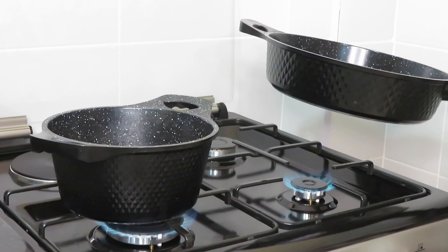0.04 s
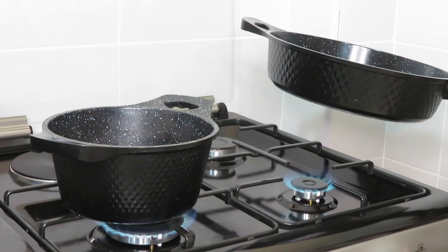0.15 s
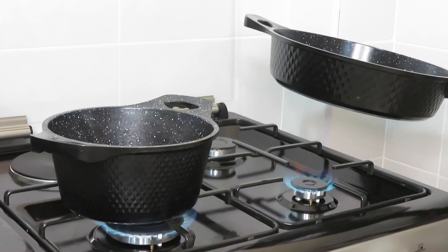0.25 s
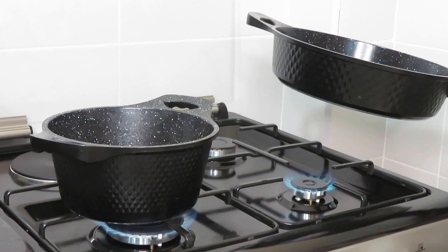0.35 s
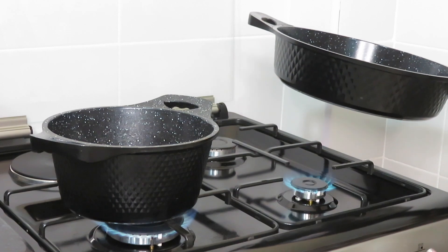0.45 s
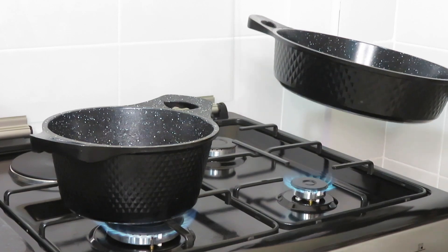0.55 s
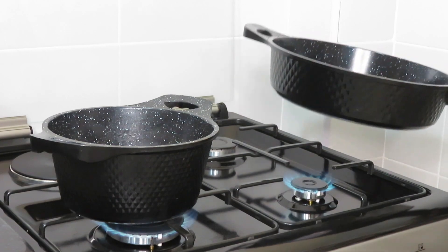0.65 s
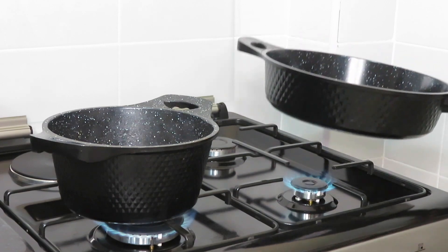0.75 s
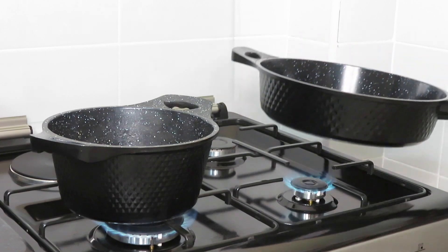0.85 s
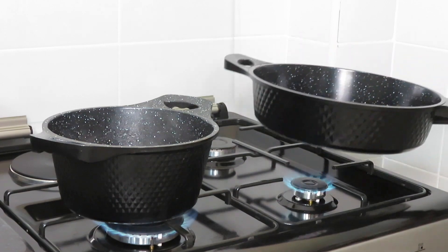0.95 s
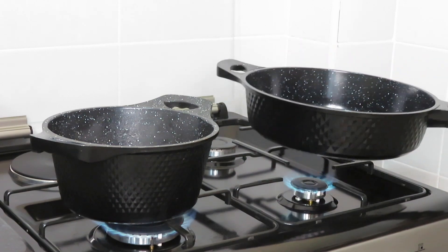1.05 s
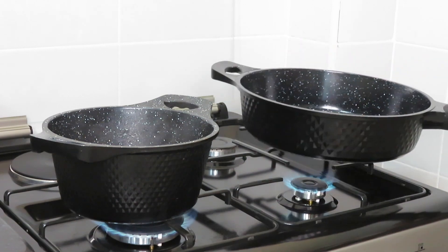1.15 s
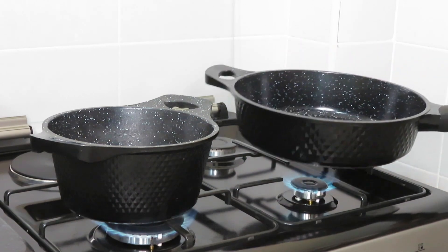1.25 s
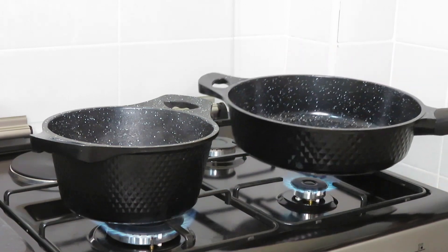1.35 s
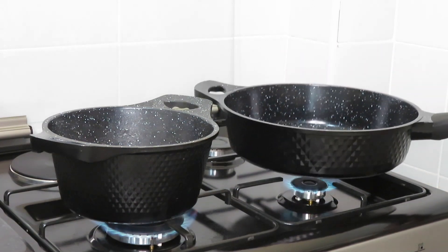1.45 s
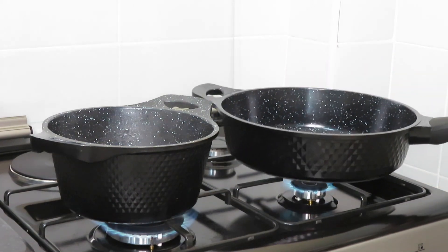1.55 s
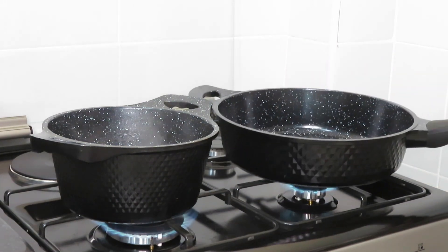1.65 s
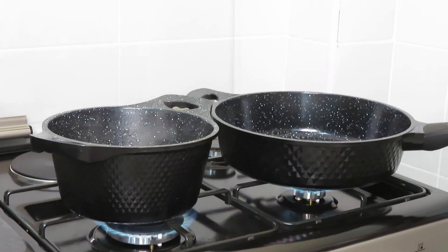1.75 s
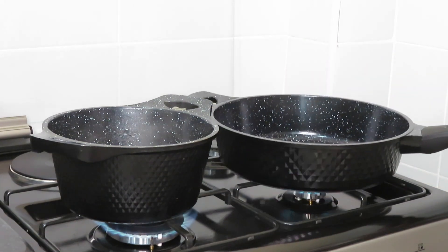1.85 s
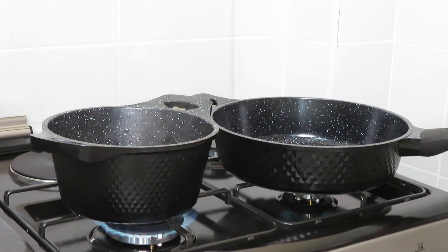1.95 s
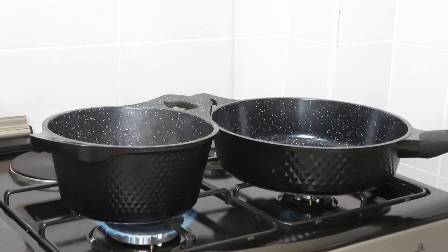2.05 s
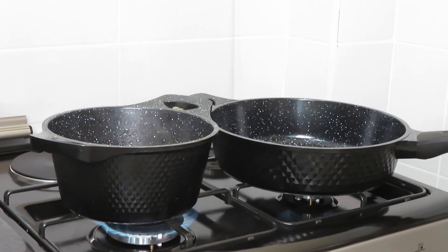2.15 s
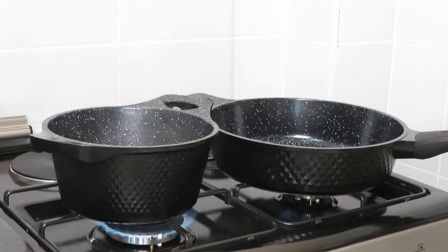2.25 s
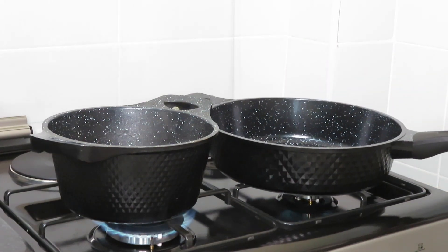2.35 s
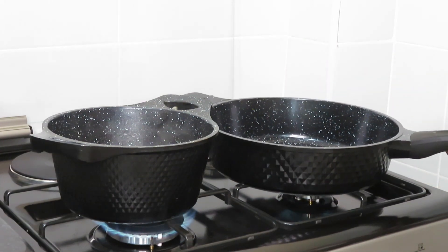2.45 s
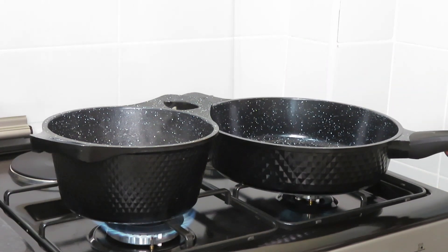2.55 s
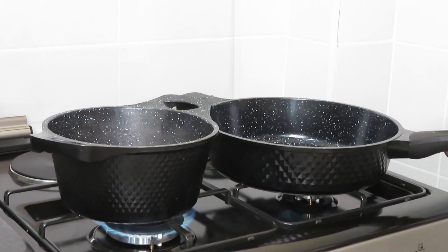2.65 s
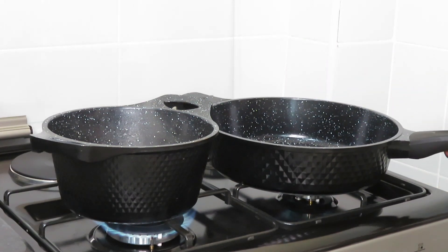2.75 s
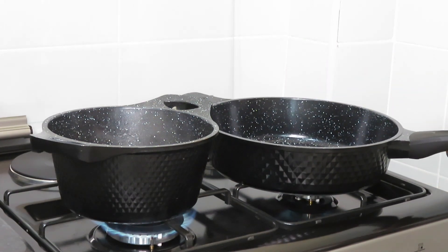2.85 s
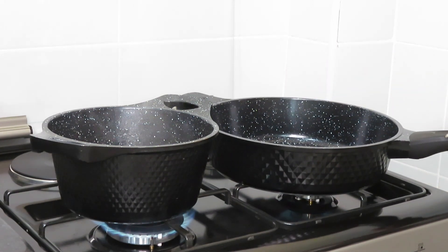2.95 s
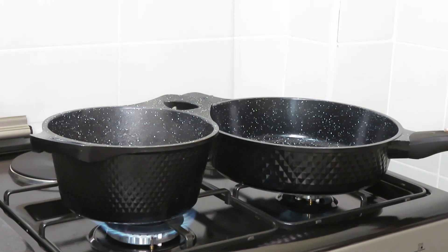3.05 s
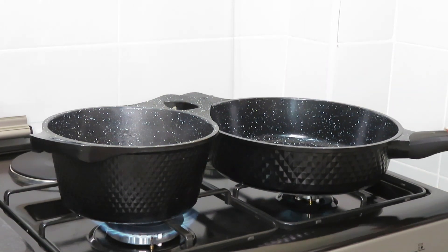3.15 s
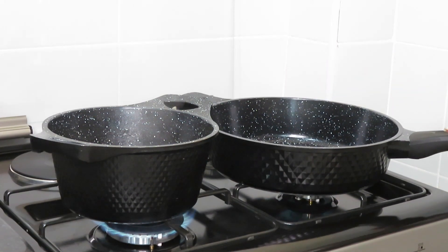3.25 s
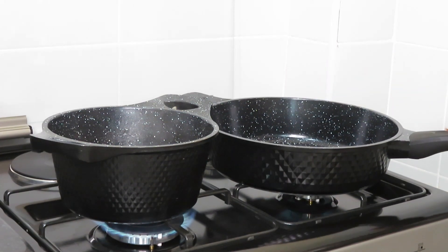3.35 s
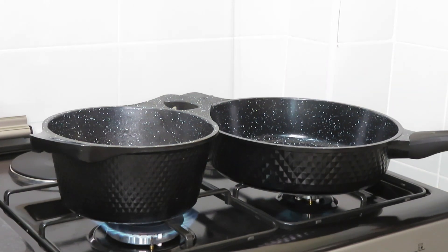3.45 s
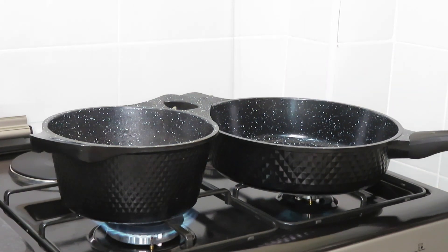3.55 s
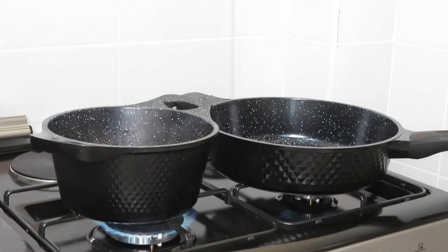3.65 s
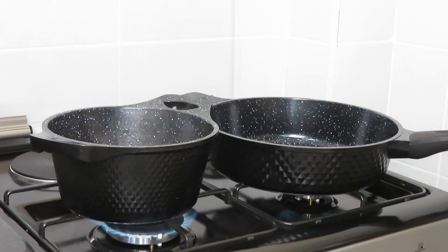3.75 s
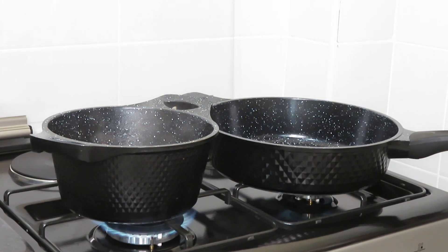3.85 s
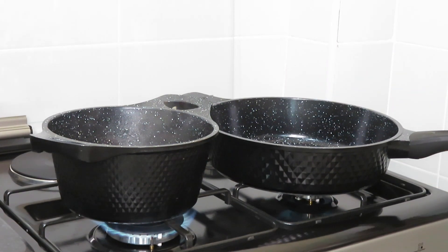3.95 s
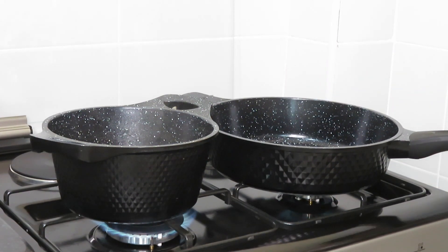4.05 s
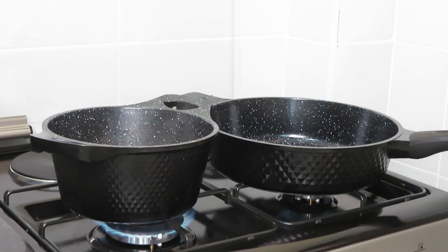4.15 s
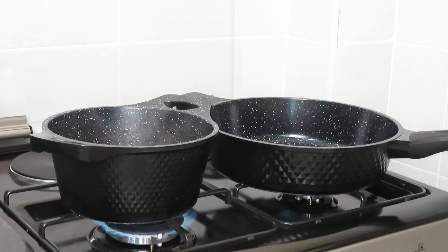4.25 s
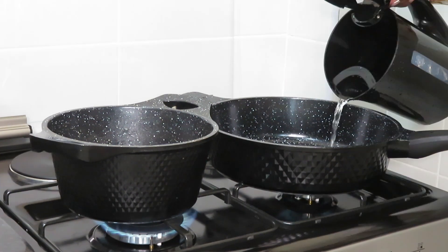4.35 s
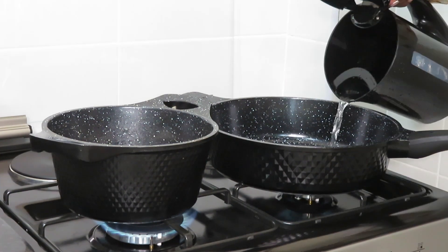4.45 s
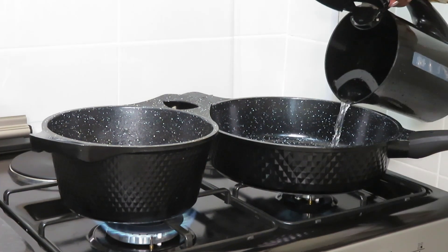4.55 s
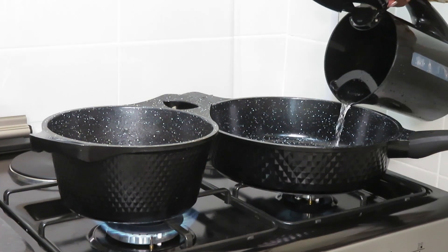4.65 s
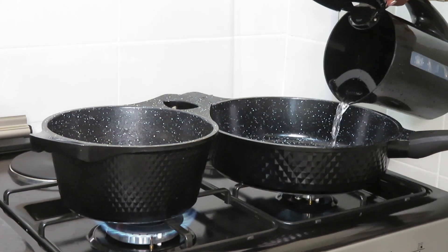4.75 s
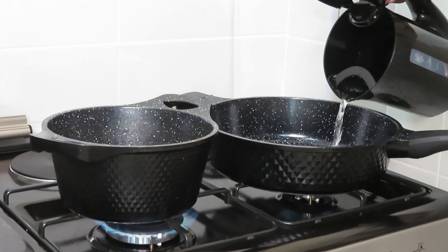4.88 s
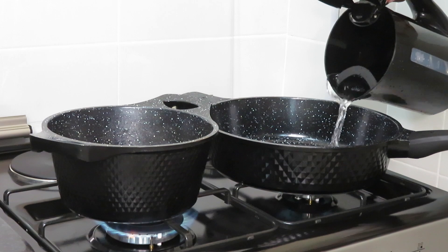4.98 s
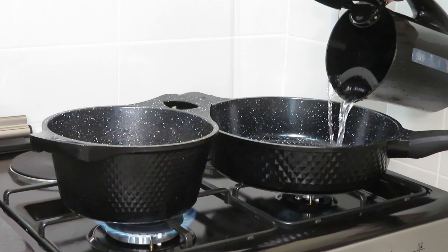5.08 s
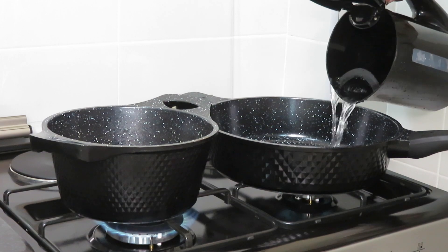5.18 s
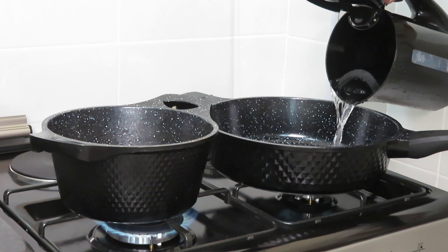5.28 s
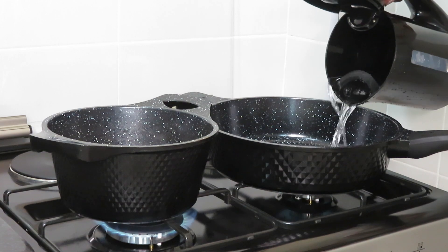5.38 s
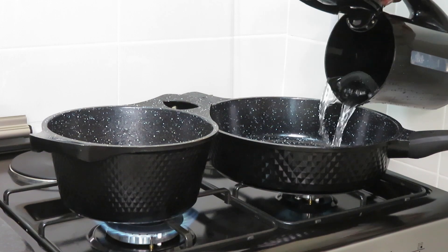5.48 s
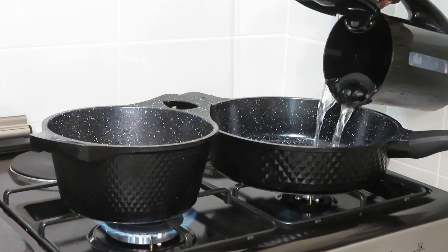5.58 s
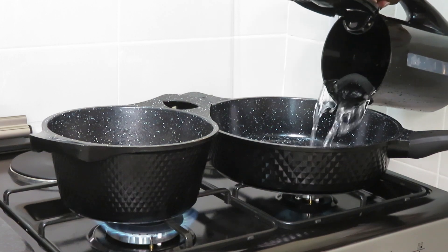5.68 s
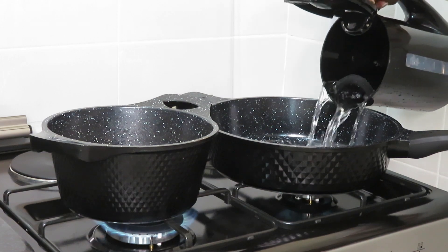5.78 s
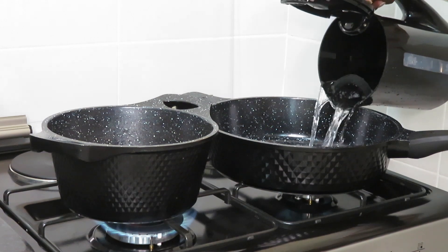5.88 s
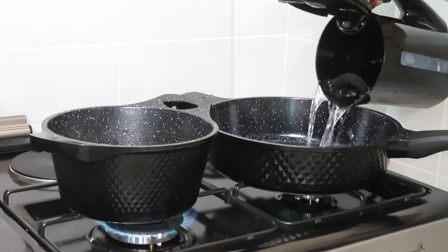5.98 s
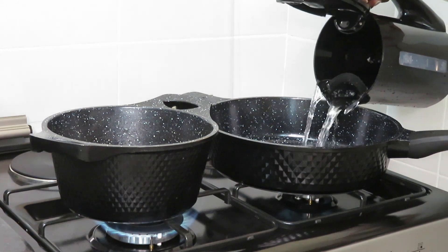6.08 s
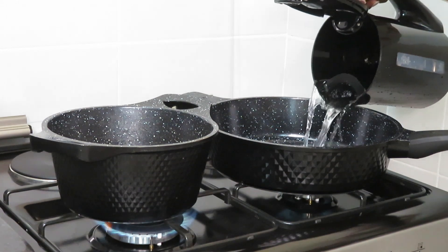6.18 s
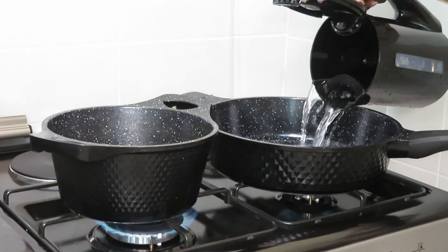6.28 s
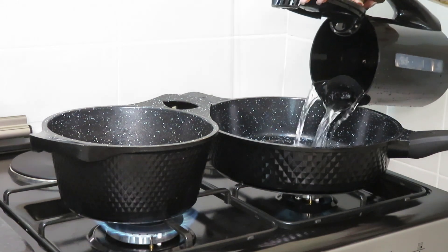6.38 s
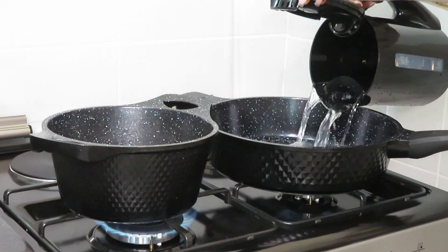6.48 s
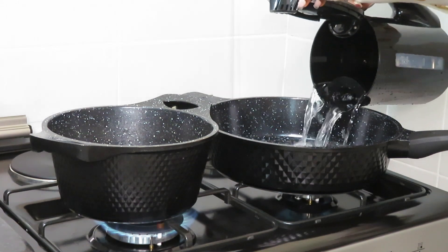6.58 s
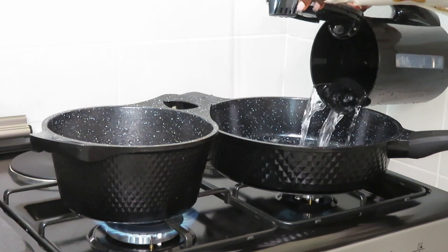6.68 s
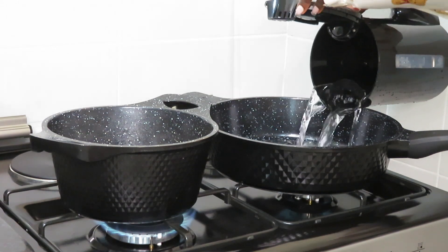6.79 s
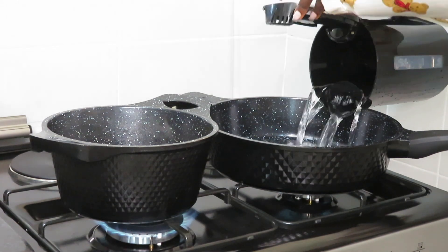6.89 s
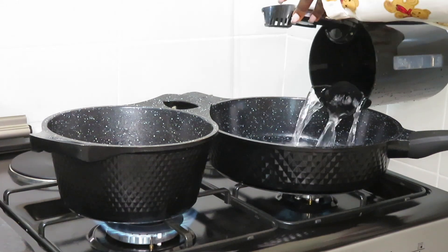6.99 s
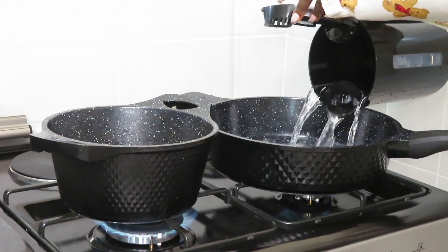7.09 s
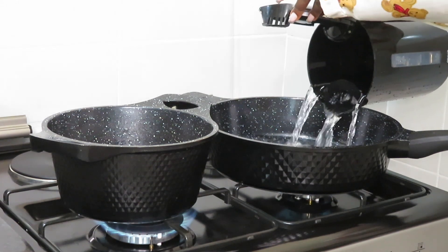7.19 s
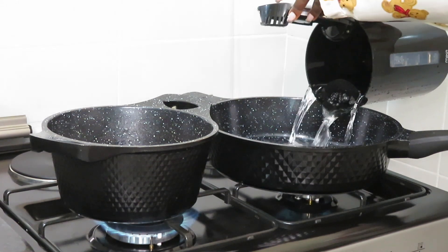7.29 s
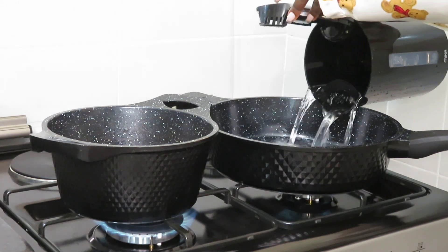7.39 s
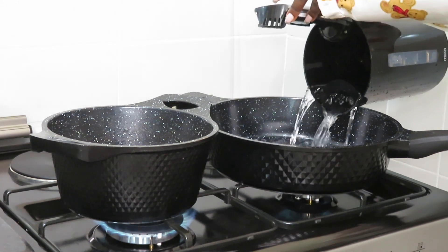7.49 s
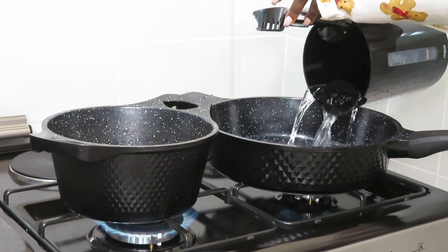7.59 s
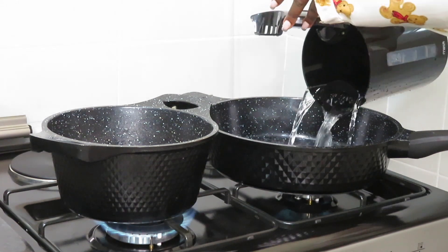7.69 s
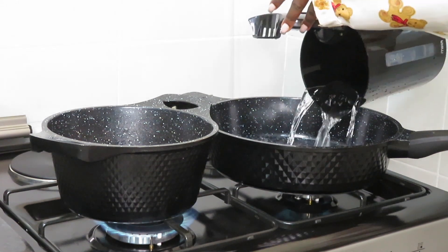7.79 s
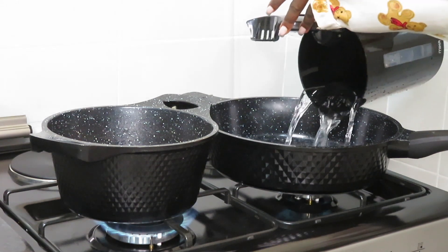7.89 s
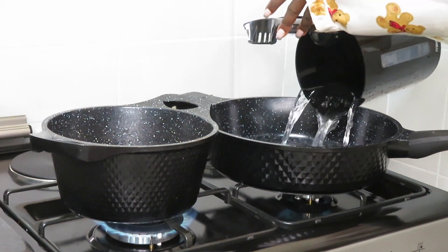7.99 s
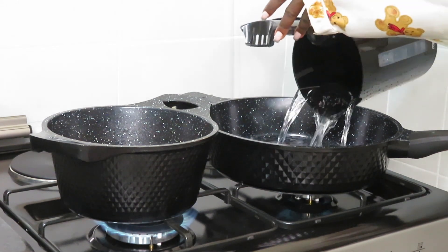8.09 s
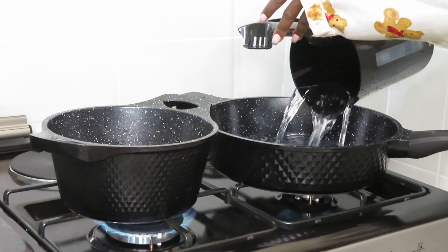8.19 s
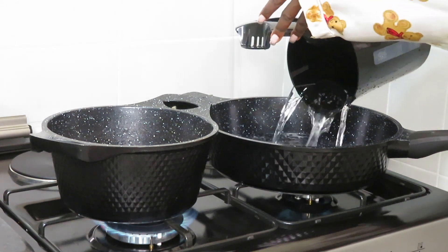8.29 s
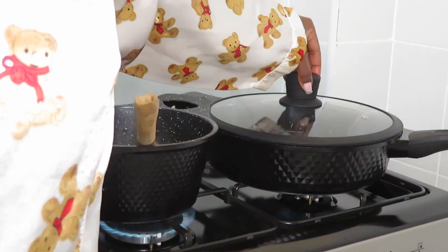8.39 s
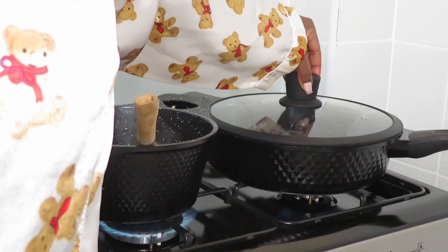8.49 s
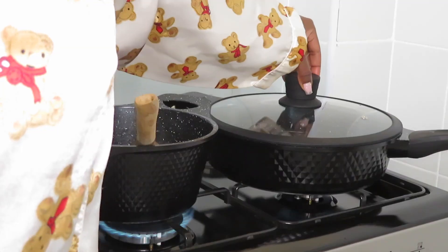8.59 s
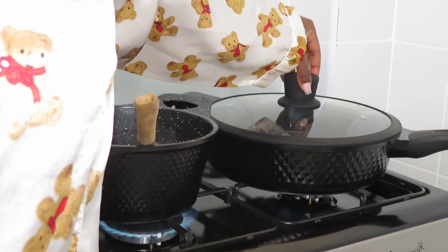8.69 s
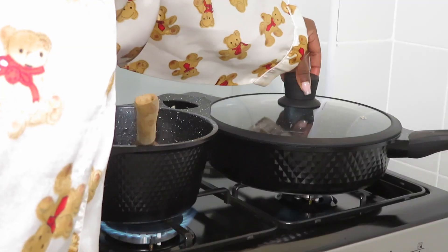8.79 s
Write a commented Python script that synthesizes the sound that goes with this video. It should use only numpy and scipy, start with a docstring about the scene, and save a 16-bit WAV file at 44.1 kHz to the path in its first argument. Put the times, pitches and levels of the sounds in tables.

```python
"""A tiled kitchen: gas burners roar and flutter, made of noise shaped into jets, flames and hiss.
A knob clacks and a cast pan lands on the grate, rattles and drags: decaying tones and noise bursts.
A slipper sole scuffs with a sinking squeak: grainy noise through moving resonances.
Then a kettle pours into the hot pan: frothy sizzle, ringing drops, splashes, glugs and a hollow hum."""
import sys
import numpy as np
from scipy import signal
from scipy.fft import rfft, irfft, next_fast_len
from scipy.io import wavfile
from scipy.ndimage import uniform_filter1d, map_coordinates

SR = 44100
rng = np.random.default_rng(int(sys.argv[2]) if len(sys.argv) > 2 else 0)


def to_wav(s):
    """Save 16-bit WAV."""
    ch = np.atleast_2d(s).T  # columns
    pcm = np.round(np.clip(ch, -1, 1) * 32767)  # PCM
    wavfile.write(sys.argv[1], SR, pcm.astype(np.int16))


N = 389394  # length in samples

# Loudest plops and spits: start_s, relative_level_db, starting_pitch_hz, smear_t60_s (time to fall 60 dB)
DROPS = [(5.008, -48, 3044, .41), (5.459, -46, 7270, .22), (5.583, -45.5, 9100, .24),
         (5.732, -46.5, 5080, .19), (5.881, -44.5, 6530, .27), (5.919, -45.5, 9640, .17),
         (6.037, -43, 11300, .084), (6.26, -38, 1996, .15), (6.377, -45.5, 8800, .2),
         (6.497, -41, 3800, .4), (6.51, -44, 1620, .3), (6.699, -43, 6380, .25), (6.716, -35.5, 2500, .17),
         (6.831, -43.5, 11200, .1), (7.006, -42.5, 1250, .12), (7.05, -47.5, 3100, .54),
         (7.111, -41.5, 3380, .45), (7.147, -40.5, 7900, .12), (7.159, -45.5, 4200, .3),
         (7.219, -45, 1370, .2), (7.295, -44, 3000, .11), (7.362, -44, 1380, .3), (7.395, -44, 1300, .4),
         (7.392, -45, 6600, .08), (7.457, -41, 11220, .1), (7.467, -46, 3025, .34),
         (7.471, -41.5, 1800, .23), (7.504, -37, 2196, .18), (7.538, -35.5, 1895, .12),
         (7.539, -42, 4850, .18), (7.55, -42, 3400, .15), (7.576, -41, 1755, .21), (7.652, -43, 1934, .25),
         (7.697, -43, 5300, .39), (7.702, -43, 4100, .35), (7.863, -36.5, 3350, .08),
         (7.865, -46.5, 1662, .18), (7.907, -36.5, 8550, .088), (7.938, -39, 1918, .24),
         (8.013, -44, 3740, .45), (8.024, -37.5, 2424, .2), (8.05, -43, 7980, .19), (8.159, -42, 6360, .1),
         (8.177, -43.5, 2180, .21), (8.206, -40, 4120, .22), (8.248, -45.5, 2046, .53),
         (8.299, -41, 1763, .18), (8.338, -38.5, 6330, .13), (8.338, -40, 1512, .18),
         (8.375, -40, 6460, .091)]
# A gush slaps the pan floor: start_s, relative_level_db
SPLASHES = [(5.824, -27), (5.838, -31)]
# Ring of the pan under water: pitch_hz, relative_level_db
WET_PAN = [(1560, -8), (2380, 0), (3030, -1), (3390, -2), (3760, -4), (4470, -9)]
WET_WIDTH_HZ = 60
# Air pockets: start_s, relative_level_db, starting_pitch_hz, timescale_s (several fades are scaled from it)
GLUGS = [(7.005, -22, 440, 0.1), (7.008, -36, 150, 0.15), (7.021, -35, 1020, .06), (7.028, -29, 375, 0.11),
         (7.075, -33, 310, 0.15), (7.103, -35, 510, .06), (8.43, -52, 100, .3), (8.442, -37, 184, 0.15),
         (8.487, -36, 173, 0.196)]
GLUG_SAG = 1.5  # half the share of its starting pitch that a pocket loses per s
# Air gulps make the emptying kettle hum: peak_s, low_tone_db, high_tone_db
HOLLOW = [(7.93, -74, -54), (8.05, -55, -50), (8.12, -70, -50), (8.2, -51, -42), (8.3, -58, -52),
          (8.37, -53, -60)]
# The low and high hum of the kettle: pitch_hz, width_hz
HOLLOW_TONES = [(205, 5.2), (720, 44)]
GULP_RISE, GULP_FALL = 300, 190  # dB/s
# Small drops fall at random between these times, ever more densely: start_s, end_s
POUR_S = (5.2, 8.36)
SMALL_DB, SMALL_SPREAD_DB = -52, 6  # middle and full range of their relative level
# Pitch range of the small drops: lowest_hz, highest_hz
SMALL_HZ = (1400, 11000)
DROP_T60, SHORTER_UP = .3, .3  # smear of a small drop at 2 kHz in s; it shrinks with this power of pitch

# Pan touches the grate: start_s, relative_level_db
LANDINGS = [(2.011, -27), (2.0195, -7)]
# Ringing modes of pan and grate: pitch_hz
PAN_HZ = [118, 183, 298, 511, 625, 743, 834, 1034, 1222, 1820, 3445, 1532, 1759, 2139, 2304, 2466, 2638,
          2822, 3325, 3407, 3601, 4291, 4464, 5152, 6465, 7817]
# The same modes: relative_level_db, t60_s (before the seated pan is damped)
PAN_MODES = [(-16, .3), (-19, .8), (-17, .8), (-10, .35), (-15, .7), (-18, .7), (-7, .95), (-21, 1.1),
             (-7, .45), (-19, .8), (-18, .8), (-15, 1), (-16.5, .7), (-16, 1), (-21, .5), (-15.5, 0.95),
             (-19.5, .8), (-5.5, 0.45), (-1, .6), (-10, .5), (-14, 0.75), (-16, .4), (-17, .5), (-14, 0.2),
             (-26, 0.11), (-24.5, .2)]
# Dense modes of the hob top: frequency_hz, relative_level_db
CLANG = [(40, -65), (120, -7), (830, -5.5), (2900, -12.5), (5000, -18.5), (11400, -24.5), (14000, -60)]
# How long the clang rings: frequency_hz, t60_s
CLANG_T60 = [(100, 1), (500, 0.98), (2000, 0.88), (5000, .45), (12000, .2)]
SEATED_S, SEATED_KEEPS = .24, .18  # when the weight settles, in s after contact; share of ring left
BEAT_HZ = 45  # random level points per second for each mode
PORT_TURN = .015  # typical random phase offset of a mode in each channel, in cycles
# The pan rocks on the bars: start_s, level_db (average over one second)
RATTLES = [(2.305, -57), (2.385, -60), (2.455, -58), (2.538, -53), (2.6, -60)]
RATTLE_T60 = .06  # s, for the noise that strikes the grate
# Resonances of the grate: pitch_hz, width_hz, relative_level_db
GRATE = [(70, 40, -21), (120, 30, -8), (180, 14, 3), (300, 20, 4), (405, 40, -6), (511, 40, -7),
         (615, 50, -5), (834, 25, -14), (1040, 60, -16)]
# Pan dragged on the grate: hold_from_s, hold_to_s, level_db, rise_db_per_s, fall_db_per_s
SLIDE = (2.15, 2.6, -41.5, 400, 240)
# Base grates over a bar: hold_from_s, hold_to_s, level_db, rise_db_per_s, fall_db_per_s
SCRAPE = (2.3, 2.56, -55, 120, 200)

# Knob clacks: start_s, panel_db, snap_db, thud_db (all relative), panel_t60_s
KNOB = [(0.0156, -26.5, -13, -44, 0.61), (.069, -23.5, -39.5, -42, 0.19), (.256, -14, -47.5, -33.5, 0.31),
        (.36, -16, -47, -37, .25)]
# Tones of knob and front panel: pitch_hz, relative_level_db, t60_s (an overall fade shortens them)
PANEL = [(330, -9, .3), (700, -9, .4), (1086, -4.5, 0.23), (1600, -7, 0.54), (1843, -6, 0.26),
         (2148, -3, .17), (2500, -7, 0.41), (2790, 5, 0.12), (3350, -3, .1), (3128, -3, .17),
         (4102, -6, .12)]

# Rub of the sole: frequency_hz, relative_level_db
SOLE = [(800, -41), (1300, -16), (2170, -3), (2900, -8), (4000, -12), (5080, -23), (12000, -47)]
# The sole's resonance sinks as it flattens: time_s, pitch_hz
SQUEAK = [(3.13, 2750), (3.2, 2300), (3.3, 2100), (3.37, 1850)]
SQUEAK_DB, OVERTONE, OVERTONE_DB = 6, 1.7, 1  # boost, overtone pitch ratio, overtone boost
# Sole drags: hold_from_s, hold_to_s, level_db, rise_db_per_s, fall_db_per_s
SOLE_DRAG = (3.19, 3.32, -37.5, 200, 270)
# Dull heel tone: hold_from_s, hold_to_s, level_db, rise_db_per_s, fall_db_per_s
HEEL_TONE = (3.283, 3.31, -47, 700, 360)

# Burner levels: time_s, jet_roar_db, flame_flutter_db
BURNER = [(0, -44, -50), (.55, -49, -53), (1.1, -52, -56.5), (2, -56, -64.5), (2.55, -53.5, -60),
          (2.75, -58, -66), (3.5, -64.5, -67), (4.355, -68.5, -75), (4.37, -50, -55), (5.2, -48, -55),
          (5.8, -44, -55.5), (6.2, -48, -52.5), (6.6, -45, -51), (6.98, -52, -63), (7.4, -40, -55),
          (7.85, -49, -63.5), (8.39, -46, -59), (8.41, -44, -51.5), (8.83, -46, -48.5)]
# Tone balance of the gas jets: frequency_hz, relative_level_db
JETS = [(700, -40.5), (1160, -15), (1470, -2.5), (2260, -1), (2800, -11.5), (3300, -16), (4050, -11),
        (5660, -22.5), (7000, -33.5), (10000, -71.5)]
# Tone balance of the low flame flutter: frequency_hz, relative_level_db
FLAME = [(30, -56), (128, -18), (400, -12), (594, 0), (650, -8), (754, -3), (893, -13.5), (1150, -22.5),
         (1600, -60.5)]
# Tone balance of hiss and sizzle: frequency_hz, relative_level_db
FIZZ = [(1470, -31.5), (2500, -6.5), (5840, -10), (7750, -15), (11000, -15), (13600, -20), (15500, -33.5)]
GAS_HISS_DB, GAS_HISS_FOLLOWS = -70, .4  # level at a roar of -55 dB; share of roar swings followed
PUFF_DB, PUFF_T60 = -38, .7  # unlit gas puffs out at the very start; t60 in s
# Water on hot metal: time_s, level_db
SIZZLE = [(4.37, -50), (4.6, -52), (5.8, -53.5), (6, -45), (6.6, -61), (7.4, -54), (7.85, -54), (8.39, -64),
          (8.41, -50.5), (8.83, -52)]
# Share of the hiss broken into bursts: time_s, share_0_to_1
FROTH = [(4.9, 0), (5.3, .35), (6.3, .65), (7, .9), (8.39, .9), (8.4, 0)]

# Left-right likeness of spread sounds: frequency_hz, likeness_0_to_1
ALIKE = [(60, .92), (180, .6), (550, .78), (1650, .97), (5000, .75), (12000, 0)]
# Left-right likeness of blows and drops: frequency_hz, likeness_0_to_1
NEAR = [(100, .99), (1800, .98), (5000, .8), (12000, 0)]
# The level dips briefly: time_s, half_length_s
DIPS = [(4.372, .02), (8.406, .025)]
TOP_HZ = 15690  # nothing is heard from here up


def water():
    """Drops ring, gushes slap the pan, air pockets glug as sinking tones, and the kettle hums."""
    out, t = np.zeros((2, N)), np.arange(SR // 3) / SR
    for s, db, hz, t60 in [*DROPS, *small_drops(count=80)]:
        add(out, s, amp(db) * drop(hz, t60, t))

    def wet_ring(f):
        modes = sum(amp(level) * peak(hz, WET_WIDTH_HZ)(f) for hz, level in WET_PAN)
        return .15 * peak(3200, 5000)(f) ** 3 + modes

    for s, db in SPLASHES:
        add(out, s, amp(db) * pair(wet_ring, len(t)) * fade(t, .26, .0005))
    for s, db, hz, scale in GLUGS:
        slosh = pair(lambda f: peak(hz, 1.5 * hz)(f) ** 2, len(t)) * fade(t, 4 * scale, .0047)
        tone = np.sin(2 * np.pi * hz * t * (1 - GLUG_SAG * t))
        tone *= np.exp(-(5 * t / scale) ** 3) * fade(t, 3 * scale, .001)
        add(out, s, amp(db) * (tone + .32 * slosh))
    for tone, (hz, width) in enumerate(HOLLOW_TONES):
        gulps = sum(amp(swell(s, s, dbs[tone], GULP_RISE, GULP_FALL)) for s, *dbs in HOLLOW)
        out += gulps * pair(peak(hz, width), N)
    return out


def drop(hz, t60, t):
    """A short rising bubble tone and the narrow, uneven smear that pan and tiles give back."""
    bubble = np.sin(2 * np.pi * hz * t * (1 + 1.5 * t)) * fade(t, 110 / hz, .001)
    lumps_db = 5 * rng.standard_normal(120)
    lump_hz = np.linspace(0, 2 * hz, len(lumps_db))
    answer = lambda f: peak(hz, .27 * hz)(f) ** 3 * amp(np.interp(f, lump_hz, lumps_db))
    return 2.7 * bubble + 1.7 * pair(answer, len(t)) * fade(t, t60, .0015)


def small_drops(count):
    """Rows like those of DROPS, at random times, strengths and pitches."""
    when, size, pitch = rng.random((count, 3)).T
    start_s = POUR_S[0] + np.sqrt(when) * (POUR_S[1] - POUR_S[0])  # the root crowds them late
    level_db = SMALL_DB + SMALL_SPREAD_DB * (size - .5)
    hz = SMALL_HZ[0] * (SMALL_HZ[1] / SMALL_HZ[0]) ** pitch
    return np.column_stack([start_s, level_db, hz, DROP_T60 * (2000 / hz) ** SHORTER_UP])


def pan():
    """A landing rings clear modes over a dense clang that dies faster in the treble; then drag and rattle."""
    out, t = np.zeros((2, N)), np.arange(SR) / SR
    lumps_db = 4 * rng.standard_normal(1200)  # many close modes make the clang uneven in pitch
    lump_hz = np.linspace(0, SR / 2, len(lumps_db))
    clang_tone = lambda f: amp(along(CLANG, f) + np.interp(f, lump_hz, lumps_db))
    # the ring is damped once the full weight rests on the grate
    seated = SEATED_KEEPS + (1 - SEATED_KEEPS) / (1 + (t / SEATED_S) ** 12)
    for s, db in LANDINGS:
        hz, frame_s, z = signal.stft(pair(clang_tone, SR), SR, nperseg=256)
        z = z * amp(-60 * frame_s / along(CLANG_T60, hz)[:, None])
        clang = signal.istft(z, SR, nperseg=256)[1][:, :SR] * (1 - np.exp(-t / .005))
        modes = seated * ring(np.column_stack([PAN_HZ, PAN_MODES]), t, scatter_db=3)
        add(out, s, amp(db) * (.37 * modes * (1 - np.exp(-t / .003)) + .21 * clang))

    # signs alternate so that neighbouring resonances do not cancel in between
    iron = lambda f: sum((-1) ** k * amp(db) * peak(c, w)(f) for k, (c, w, db) in enumerate(GRATE))
    grit = lambda f: sum((-1) ** k * peak(c, 90)(f) for k, c in enumerate(PAN_HZ) if 1400 < c < 3700)
    for s, db in RATTLES:
        knock = rng.standard_normal(SR) * fade(t, RATTLE_T60, .008)
        add(out, s, amp(db) * unit(filtered(knock, lambda f: iron(f) * peak(350, 500)(f) ** 2)))
    out += amp(swell(*SCRAPE) + 2.5 * wobble(50)) * patchy(pair(grit, N), depth_db=4)
    return out + amp(swell(*SLIDE) + 1.5 * wobble(30)) * patchy(pair(iron, N), depth_db=3)


def knob():
    """Each clack rings the panel, with a bright snap and a dull thud that die in the room."""
    out, t = np.zeros((2, N)), np.arange(SR // 2) / SR
    for s, panel_db, snap_db, thud_db, t60 in KNOB:
        rattle = pair(lambda f: peak(2100, 4500)(f) ** 4, len(t))
        body = (.18 * ring(PANEL, t, scatter_db=2.5) + .22 * rattle) * fade(t, t60, .0015)
        snap_fade = 1.6 * fade(t, .02, .002) + .22 * fade(t, .6 * t60, .004)  # click, then room tail
        snap = pair(peak(9000, 9000), len(t), ALIKE) * snap_fade
        thud = pair(lambda f: peak(400, 1100)(f) ** 2, len(t)) * fade(t, 2.5 * t60, .002)
        add(out, s, amp(panel_db) * body + amp(snap_db) * snap + amp(thud_db) * thud)
    return out


def slipper():
    """A sole drags over tiles in quick, uneven slips while its squeaky resonance sinks."""
    t = np.arange(N) / SR
    grain = unit(amp(2.3 * wobble(170)))
    rub = patchy(pair(lambda f: amp(along(SOLE, f)), N), depth_db=1.5)
    times = [s for s, hz in SQUEAK]

    def squeaky(hz):
        overtone = lambda f: amp(OVERTONE_DB) * peak(OVERTONE * hz, 450)(f)
        return filtered(rub, lambda f: 1 + amp(SQUEAK_DB) * peak(hz, 300)(f) + overtone(f))

    # crossfade from each pitch of the squeak to the next
    stages = zip(np.eye(len(times)), SQUEAK)
    sole = grain * unit(sum(np.interp(t, times, share) * squeaky(hz) for share, (s, hz) in stages))
    heel = pair(lambda f: peak(870, 400)(f) ** 2, N)
    return amp(swell(*SOLE_DRAG)) * sole + amp(swell(*HEEL_TONE)) * heel


def burners():
    """Turbulent jets, flames and fizz, each unsteady in its own way; the jets and fizz froth on cue."""
    t, (jets_db, flame_db), (sizzle_db,) = np.arange(N) / SR, curves(BURNER), curves(SIZZLE)
    gas_hiss = amp(GAS_HISS_DB + GAS_HISS_FOLLOWS * (jets_db + 55))
    hiss = gas_hiss + amp(PUFF_DB - 60 * t / PUFF_T60) + amp(sizzle_db)
    draught = wobble(4.3)  # sways jets and flames together
    noise = lambda table, depth_db: patchy(pair(lambda f: amp(along(table, f)), N, ALIKE), depth_db)
    jets = amp(jets_db + .8 * draught) * noise(JETS, 2.5)
    flame = amp(flame_db + 2.7 * draught) * noise(FLAME, 3.14)
    fizz = hiss * amp(wobble(12)) * noise(FIZZ, 2.5)
    return flame + frothy(jets + fizz, rate=750, t60=.17)


def frothy(x, rate, t60):
    """Break a hiss into short narrow bursts, each starting sharply and dying away."""
    _, s, z = signal.stft(x, SR, nperseg=256)
    starts = rng.random(z.shape[1:]) < rate * s[1] / len(z[0])  # rate bursts a second over all pitches
    pops = starts * amp(-12 * rng.random(z.shape[1:]))
    spread = uniform_filter1d(uniform_filter1d(pops, size=3, axis=0), size=2, axis=0)
    bursts = signal.lfilter([1], [1, -amp(-60 * s[1] / t60)], spread, axis=1)
    share = np.interp(s, *np.transpose(FROTH))
    return signal.istft(z * (1 - share + share * unit(bursts)), SR, nperseg=256)[1][:, :N]


def ring(modes, t, scatter_db):
    """Modes at new strengths and phases, each beating unevenly with its close neighbours."""
    beat = lambda: map_coordinates(rng.standard_normal(int(t[-1] * BEAT_HZ) + 4), [t * BEAT_HZ])
    out = 0
    for hz, db, t60 in modes:
        level = amp(db + scatter_db * beat() - 60 * t / t60)
        cycles = hz * t + rng.random() + rng.normal(0, PORT_TURN, (2, 1))
        out = out + level * np.sin(2 * np.pi * cycles)
    return out


def pair(response, length, alike=NEAR):
    """Stereo noise of rms 1, its left-right likeness set for each frequency by mixing mid and side."""
    turn = lambda hz: np.arccos(np.clip(along(alike, hz), -1, 1)) / 2
    shape = lambda hz: response(hz) * [np.cos(turn(hz)), np.sin(turn(hz))]
    mid, side = filtered(rng.standard_normal((2, length)), shape)
    return unit(np.array([mid + side, mid - side]))


def patchy(x, depth_db):
    """Random gain patches over time and frequency."""
    z = signal.stft(x, nperseg=512)[2]
    field = uniform_filter1d(rng.standard_normal(z.shape[1:]), size=6, axis=0)
    field = uniform_filter1d(field, size=8, axis=1)
    return unit(signal.istft(z * amp(depth_db * unit(field)), nperseg=512)[1][:, :N])


def peak(hz, width):
    """A resonance that rings only after it is struck; both settings in Hz."""
    return lambda f: 1j * f * width / (hz * hz - f * f + 1j * f * width)


def filtered(x, response):
    """x times a complex response of frequency."""
    m = next_fast_len(x.shape[-1] + 2048)
    return irfft(rfft(x, m) * response(np.fft.rfftfreq(m, 1 / SR)), m)[..., :x.shape[-1]]


def fade(t, t60, attack):
    """A quick rise and an exponential fall of 60 dB in t60 seconds."""
    return amp(-60 * t / t60) * (1 - np.exp(-t / attack))


def swell(start, end, db, rise, fall):
    """A level in dB that climbs, holds from start to end and falls."""
    t = np.arange(N) / SR
    return db + np.minimum(0, np.minimum(rise * (t - start), fall * (end - t)))


def wobble(rate):
    """A smooth random curve, rate knots a second."""
    return map_coordinates(rng.standard_normal(int(N * rate / SR) + 4), [np.arange(N) * rate / SR])


def curves(rows, outside=-150):
    """One value per sample for each column after the time."""
    s, *cols = np.transpose(rows)
    return [np.interp(np.arange(N) / SR, s, c, outside, outside) for c in cols]


def along(points, hz):
    """Read (Hz, value) points on a log frequency axis."""
    f, v = np.transpose(points)
    return np.interp(np.log(hz + 1), np.log(f + 1), v)


def amp(db):
    """Turn dB into a plain gain."""
    return 10 ** (np.asarray(db) / 20)


def unit(x):
    """Scale to rms 1."""
    return x / np.sqrt(np.mean(x ** 2) + 1e-20)


def add(out, s, sound):
    """Mix a sound in at time s, in seconds."""
    part = out[:, round(s * SR):][:, :sound.shape[-1]]
    part += sound[..., :part.shape[1]]


def scene():
    """All sources together."""
    return water() + pan() + knob() + slipper() + burners()


def record(dry):
    """Two brief level dips, bass and treble roll-off, and nothing above the band limit."""
    t = np.arange(N) / SR
    dips = np.prod([np.clip(np.abs(t - s) / half, .05, 1) for s, half in DIPS], axis=0)
    colour = lambda hz: 1j * hz / (40 + 1j * hz) / np.sqrt(1 + (hz / 14000) ** 16)
    return filtered(dry * dips, lambda hz: colour(hz) * (hz < TOP_HZ))


dry = scene()
out = record(dry)
to_wav(out)
```